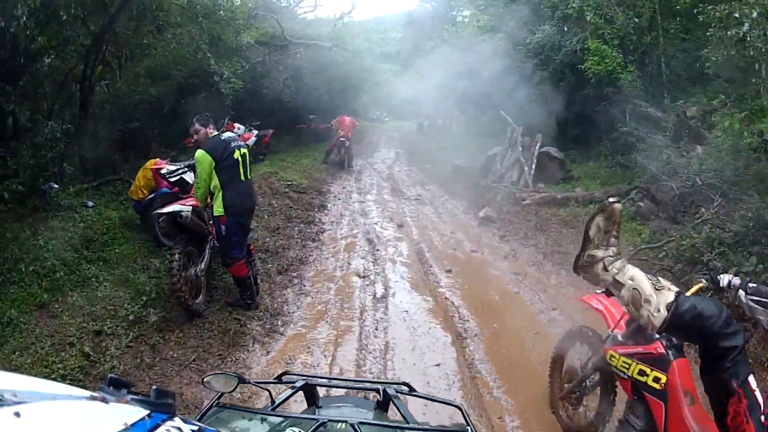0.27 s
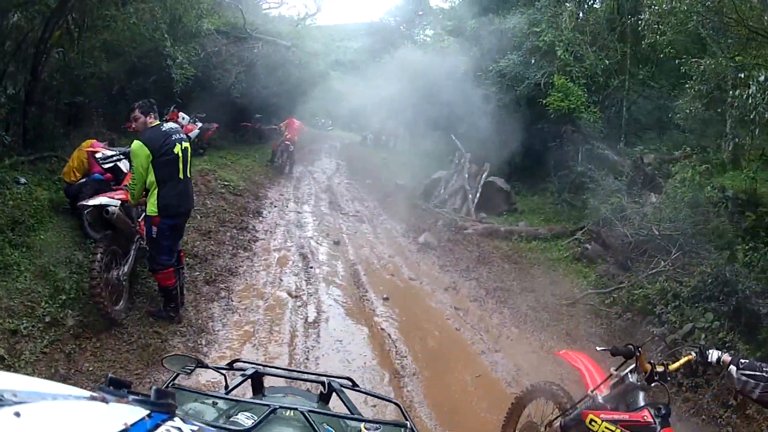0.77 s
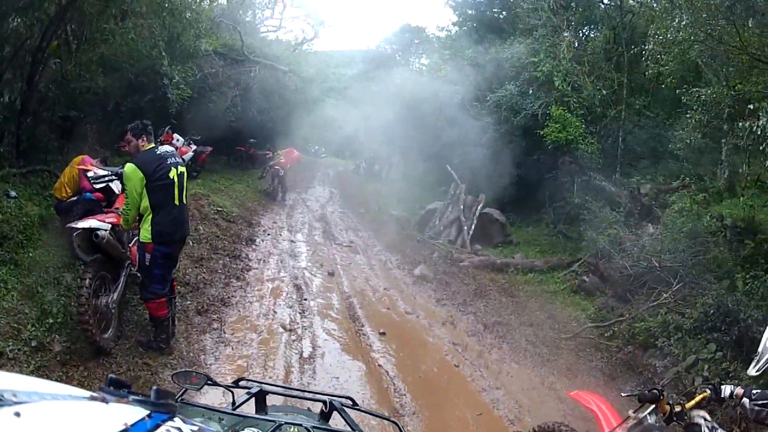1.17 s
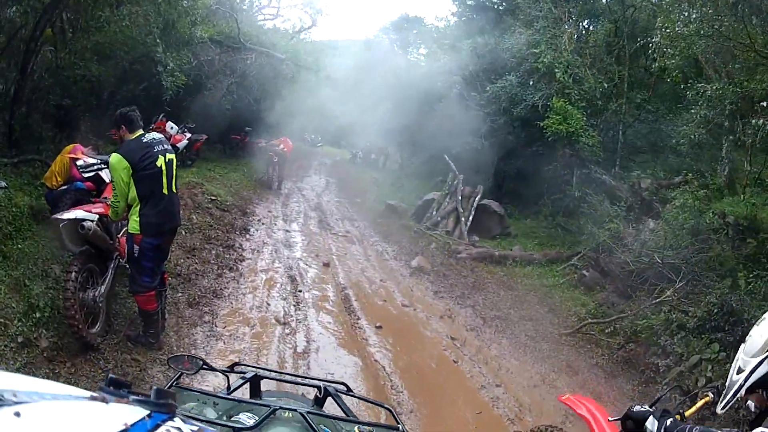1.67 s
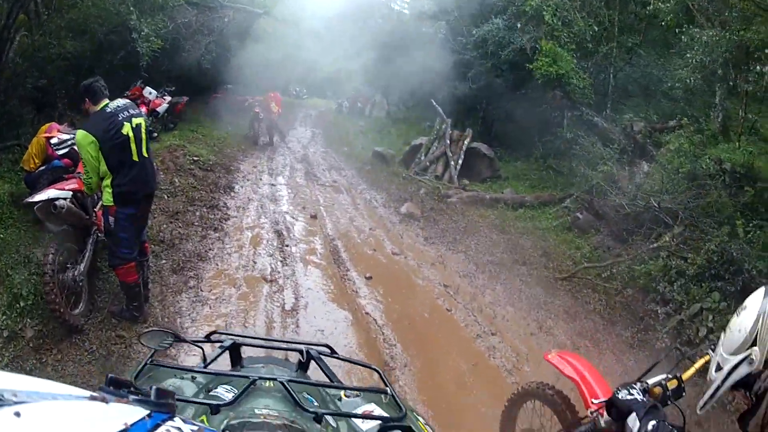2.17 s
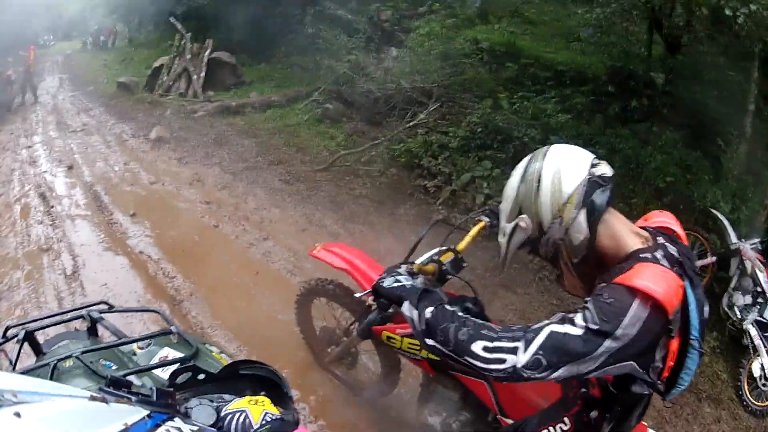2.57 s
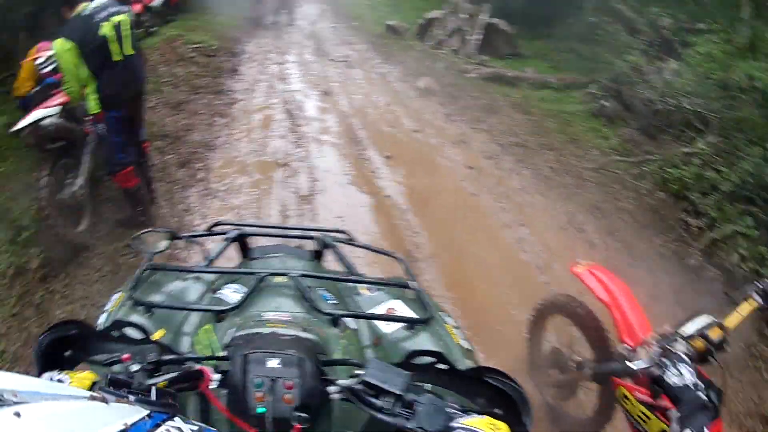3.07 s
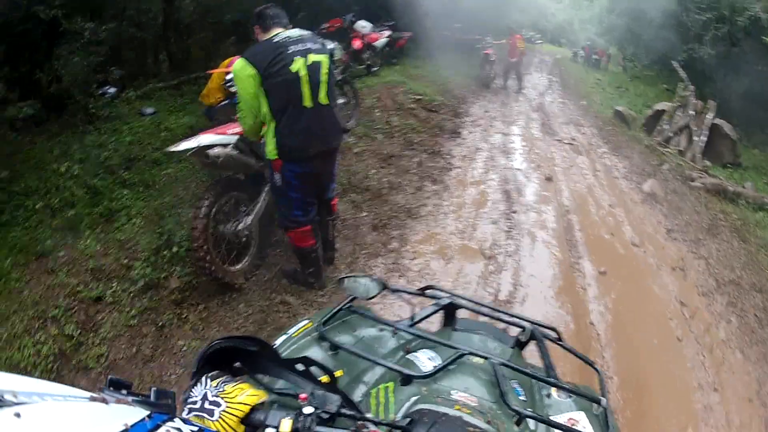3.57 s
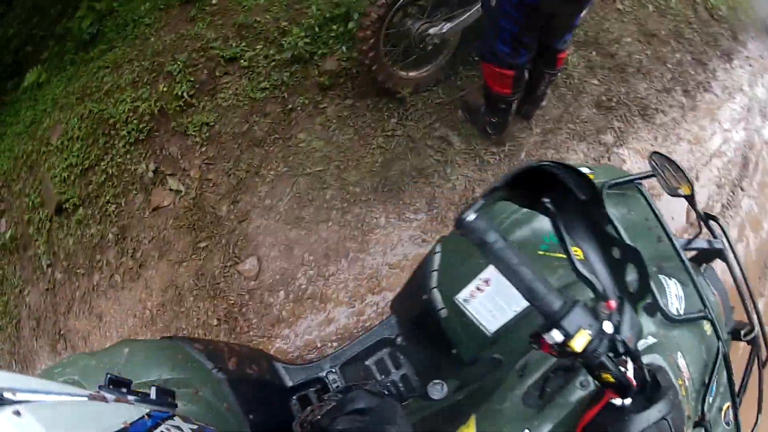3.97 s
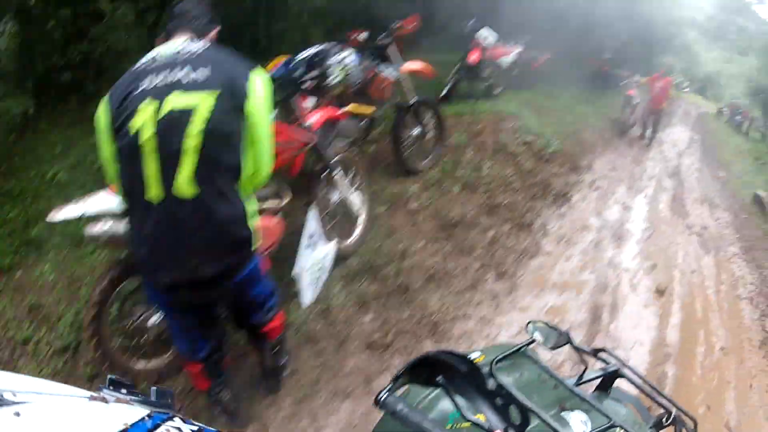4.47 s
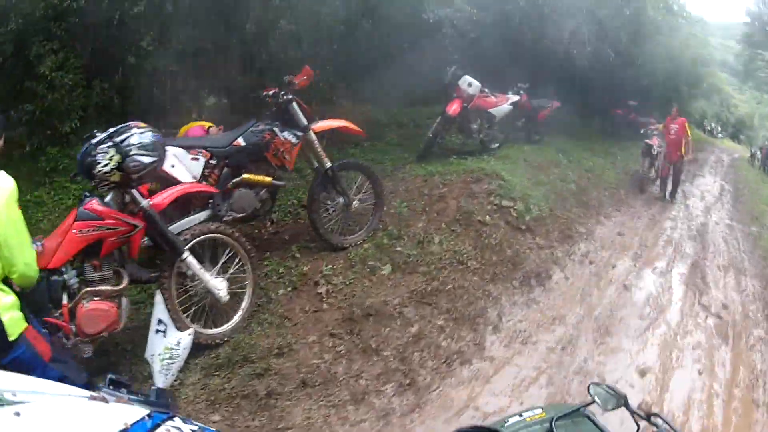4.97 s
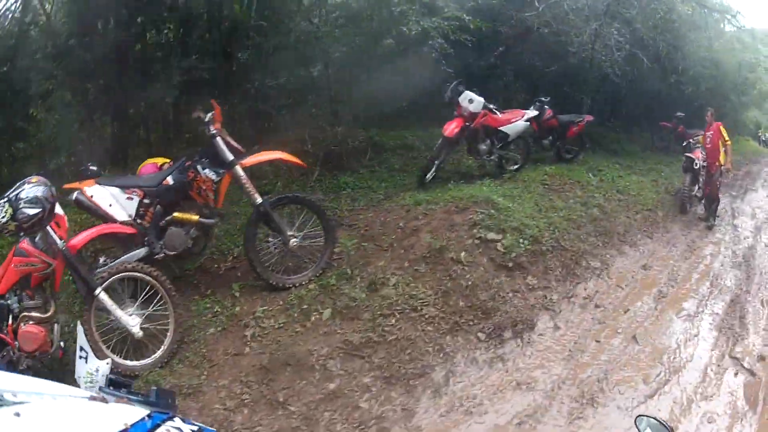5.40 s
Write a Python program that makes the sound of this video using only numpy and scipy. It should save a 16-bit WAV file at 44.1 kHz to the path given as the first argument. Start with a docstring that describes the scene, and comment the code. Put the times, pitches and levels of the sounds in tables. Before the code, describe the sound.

A quad bike engine sinks to a lumpy idle beside a clacking dirt bike, then pulls under throttle while another bike revs far off.

```python
"""On the seat of a single-cylinder quad bike, on a muddy forest track, with a small camera as microphone.
The quad sinks to idle in bursts of resonance from its pipe, while a dirt bike clacks at idle alongside.
Far off in the trees another bike blips its throttle: a few overtones over a blurred roar.
The quad then pulls under throttle, the far bike revs long and falls away, and the quad eases off.
Short clicks and gritty scuffs dot the scene, and the camera mirrors the low sound faintly into the treble."""
import sys
import numpy as np
from scipy.fft import rfft, irfft, next_fast_len
from scipy.io import wavfile
from scipy.ndimage import uniform_filter1d, map_coordinates

SR = 44100
rng = np.random.default_rng(int(sys.argv[2]) if len(sys.argv) > 2 else 0)


def digitize_waveform(pressure):
    """Quantize a signal to 16-bit integers and store it at the path in sys.argv[1].

    Rows of a 2-D input are taken as channels; values are limited to [-1, 1].
    """
    field = np.atleast_2d(pressure).T
    bounded = np.clip(field, -1, 1)
    quanta = np.round(bounded * 32767).astype(np.int16)
    wavfile.write(sys.argv[1], SR, quanta)


N = 248724  # length in samples


def amp(db):
    """Decibels to gain."""
    return 10 ** (np.asarray(db) / 20)


def unit(x):
    """Scale to rms 1."""
    return x / np.sqrt(np.mean(x ** 2) + 1e-20)


def along(points, hz):
    """Interpolate (pitch_hz, value) points on a log frequency axis."""
    point_hz, values = np.transpose(points)
    return np.interp(np.log(hz + 1), np.log(point_hz + 1), values)


def curves(rows):
    """One value per sample for each column after the time."""
    times, *columns = np.transpose(rows)
    return [np.interp(np.arange(N) / SR, times, column) for column in columns]


def wobble(rate):
    """A smooth random curve, rate knots a second."""
    return map_coordinates(rng.standard_normal(2000), [np.arange(N) * rate / SR], mode="wrap")


def filtered(x, response):
    """Multiply the spectrum of x by a response of frequency."""
    m = next_fast_len(N + SR // 2)
    return irfft(rfft(x, m) * response(np.fft.rfftfreq(m, 1 / SR)), m)[:N]


def noise(spectrum):
    """Coloured noise of rms 1."""
    return unit(filtered(rng.standard_normal(N), lambda hz: amp(along(spectrum, hz))))


def add(track, s, sound):
    """Mix a sound into a track at time s."""
    start = int(np.clip(round(s * SR), 0, N))
    track[start:start + len(sound)] += sound[:N - start]


def swell(t, peak, steep):
    """A rise and fall that reaches 1 at the peak time."""
    u = np.maximum(t / peak, 0)
    return (u * np.exp(1 - u)) ** steep


def ringing(modes, t, scatter_db, detune):
    """Damped modes sound together, struck a little differently each time."""
    hz, db, t60 = np.transpose(modes)[:, :, None]
    size, pitch = rng.standard_normal((2, len(modes), 1))
    decay = amp(db + scatter_db * size - 60 * t / t60)
    return np.sum(decay * np.sin(2 * np.pi * hz * (1 + detune * pitch) * t), axis=0)


# the far bike's long pull: start_s, pitch_hz (whine), level_db
FAR_PULL = [(3.78, 588, -44), (3.95, 623.6, -31.5), (4.25, 675, -31), (4.4, 738.4, -28.5),
            (4.56, 756, -34.5), (4.7, 662.3, -32), (4.91, 603.5, -28), (5.25, 515, -62)]
# its throttle blips before that: peak_s, peak_pitch_hz, peak_level_db
FAR_BLIPS = [(2.07, 616, -35.5), (2.449, 658.9, -34.5), (2.881, 644, -32), (3.169, 666, -37)]
BLIP_S = .045  # half length (standard deviation) of a blip


def far_revs():
    """Whine (Hz, dB) of the far bike: each blip lifts pitch and level together."""
    hz, db = curves(FAR_PULL)
    for s, peak_hz, peak_db in FAR_BLIPS:
        lift = np.exp(-((np.arange(N) / SR - s) / BLIP_S) ** 2 / 2)
        hz = hz + lift * (peak_hz - hz)
        db = db + lift * (peak_db - db)
    return hz, db


# overtones that carry from the far bike: multiple (of the firing rate), level_db (relative)
SIDE_ORDERS = [(6, -5.5), (7, 1.5), (8, 7.5), (9, -19)]
# the far exhaust blurred by the trees: pitch_hz, level_db (relative, per Hz)
ROAR = [(250, -19), (450, 0.5), (650, 2), (800, -4.5), (1000, -15.5), (1500, -17), (2300, -16.5),
        (4000, -31)]


def far_bike(roar_db=-4, roar_db_per_hz=0.0471):
    """Only neighbouring overtones carry through the trees, each fading on its own, over a roar that revs swell."""
    hz, db = far_revs()
    firing_rate = hz / 8 * (1 + .016 * wobble(55))  # the whine is the eighth multiple
    phase = 2 * np.pi * np.cumsum(firing_rate) / SR
    tone = sum(np.sin(k * phase) * amp(level + 3 * wobble(22)) for k, level in SIDE_ORDERS)
    roar = amp(roar_db + roar_db_per_hz * (hz - hz.mean())) * noise(ROAR)
    return amp(db) * (unit(tone) + roar)


# the dirt bike's idle alongside, which stumbles once: start_s, cycles (engine cycles so far)
IDLE = [(.096, 0), (.814, 5), (1.065, 7), (1.342, 9), (1.502, 10), (1.689, 11), (1.975, 13), (2.13, 14),
        (2.571, 17), (2.708, 18), (2.853, 19), (3.243, 22), (3.972, 27), (4.437, 30), (5.168, 35),
        (5.6, 38)]
# its level as the camera turns: start_s, level_db (added to each beat)
IDLE_LEVEL = [(0, 1), (2.7, -0.5), (3.3, -3), (4.5, -5), (5.5, -6)]
POWER_CLACK_DB, POWER_THUMP_DB = -28, -12.5  # power stroke, before the level above
OFFBEAT_CLACK_DB, OFFBEAT_THUMP_DB = -39, -23  # the weaker beat, one crank turn later
OFFBEAT_S = .068


def idle_beats(scatter_db=1.2):
    """(s, clack dB, thump dB) of the dirt bike: a strong and a weak beat in every cycle."""
    s, cycles = np.transpose(IDLE)
    beats = []
    for start in np.interp(np.arange(cycles[-1] + 1), cycles, s):
        db = np.interp(start, *np.transpose(IDLE_LEVEL)) + scatter_db * rng.standard_normal(4)
        beats.append((start, POWER_CLACK_DB + db[0], POWER_THUMP_DB + db[1]))
        beats.append((start + OFFBEAT_S, OFFBEAT_CLACK_DB + db[2], OFFBEAT_THUMP_DB + db[3]))
    return beats


# the dirt bike's clack: pitch_hz, level_db (relative, per Hz)
CLACK = [(300, 16.5), (600, 16), (950, 8), (1500, 9.5), (2200, 4), (3100, 2), (4200, -14), (5800, -7.5)]
# its rocker cover: pitch_hz, level_db (relative), t60_s
VALVES = [(1635, -10, 0.11), (1924, -6.5, 0.079), (2125, -15, 0.12), (2235, -5, 0.072)]
# its muffler: pitch_hz, level_db (relative), t60_s
MUFFLER = [(105.3, 1.5, 0.1), (208.3, -3, 0.11), (278.4, 4, 0.037), (343, 0.5, 0.046), (486, -9.5, 0.062)]


def dirt_bike(tail_db=-8, ragged_db=2.5, tail_t60=0.26, valve_db=-38):
    """Each beat is a clack with a ragged rattling tail, a ring of the valve gear and a thump in the muffler."""
    clacks, tails, rings = np.zeros((3, N))
    t = np.arange(SR // 5) / SR
    rise = 1 - np.exp(-t / .0005)
    thump_rise = 1 - np.exp(-t / 0.0016)
    crack = rise * amp(-60 * t / .026)
    for s, clack_db, thump_db in idle_beats():
        add(clacks, s, amp(clack_db) * crack)
        add(tails, s, amp(clack_db + tail_db - 60 * t / tail_t60) * rise)
        # the valve gear rings alike on strong and weak beats
        add(rings, s, amp(valve_db) * rise * ringing(VALVES, t, scatter_db=5.0, detune=0.0285))
        add(rings, s, amp(thump_db) * thump_rise * ringing(MUFFLER, t, scatter_db=2.0, detune=0.042))
    rattle = tails * unit(amp(ragged_db * wobble(220)))
    return (clacks + rattle) * noise(CLACK) + rings


# short clicks, some on the dirt bike's offbeats, others loose ticks and a ping:
# start_s, level_db (before rise and decay), pitch_hz, width (relative to pitch)
CLICKS = [(.154, -35, 1750, 0.4), (.449, -34.5, 1880, 0.31), (1.559, -27, 1940, 0.19),
          (2.311, -29.5, 2200, 0.31), (4.733, -31.5, 2783, 0.39), (4.807, -18, 1946, 0.081)]
# soft scuffs: peak_s, level_db, half_length_s (standard deviation)
SCUFFS = [(0.65, -34, 0.019), (0.835, -37, 0.016), (2.895, -32, 0.015), (3.122, -36, 0.019),
          (3.161, -39, 0.0092)]
# mud scraping underfoot: pitch_hz, level_db (relative, per Hz)
GRIT = [(500, -25), (1000, -2), (2000, -3), (3100, 2), (4200, -5.5), (5800, -14.5)]


def clicks_and_scuffs(t60=0.042):
    """Short clicks are noise in one resonance each; soft scuffs are gritty noise."""
    out, t = np.zeros(N), np.arange(N) / SR
    for s, db, hz, width in CLICKS:
        def resonance(f):
            """A band around the click's pitch."""
            damping = 1j * f * width * hz
            return damping / (hz * hz - f * f + damping)
        ring = unit(filtered(rng.standard_normal(N), resonance))
        add(out, s, ring * amp(db - 60 * t / t60) * (1 - np.exp(-t / 0.00077)))
    rub = sum(amp(db) * np.exp(-((t - s) / length) ** 2 / 2) for s, db, length in SCUFFS)
    grit = amp(3 * wobble(300))
    return out + rub * unit(noise(GRIT) * grit)


# the quad's engine speed: start_s, rate (firings per s)
SPEED = [(0, 17.25), (.39, 14.74), (.47, 10.25), (.56, 14.02), (.81, 10.12), (1.69, 10.64), (2.79, 10.65),
         (2.89, 17.59), (3.2, 21.77), (3.52, 20.06), (3.69, 21.28), (4.68, 20.49), (4.95, 19.39),
         (5.09, 15.92), (5.64, 13.75)]
IDLE_RATE, FULL_RATE = 10.6, 21  # firings per s at idle and at full throttle
IDLE_DB, THROTTLE_BEND = -22, 1.86  # throttle at idle; above 1, the first gain of speed takes the most throttle
PULL_DB, PULL_ACCEL = 6, 55  # extra throttle, and the gain (firings per s per s) that takes most of it


def throttle():
    """Throttle in dB relative to steady full speed: it follows the speed and opens further to accelerate."""
    rate, = curves(SPEED)
    slack = np.maximum((FULL_RATE - rate) / (FULL_RATE - IDLE_RATE), 0)
    gaining = np.maximum(np.gradient(uniform_filter1d(rate, size=2205)) * SR, 0)
    return IDLE_DB * slack ** THROTTLE_BEND + PULL_DB * np.tanh(gaining / PULL_ACCEL)


FIRST_FIRING_S = .019


def firings():
    """(s, throttle dB) of each of the quad's power strokes."""
    rate, = curves(SPEED)
    cycles = np.cumsum(rate) / SR
    cycles -= cycles[round(FIRST_FIRING_S * SR)]
    at = np.searchsorted(cycles, np.arange(np.ceil(cycles[-1])))
    return np.transpose([at / SR, throttle()[at]])


# the shaking chassis: pitch_hz, level_db (relative, per Hz)
RUMBLE = [(15, -45), (30, -20), (42, -40), (62, -5), (100, 0), (150, -8.5), (280, -16.5), (450, -46),
          (900, -58)]


def rumble(level_db=-20.5, load=0.21):
    """The chassis shakes as low noise, more so under load."""
    return amp(level_db + load * throttle()) * noise(RUMBLE)


# the rattling casing: pitch_hz, level_db (relative, per Hz)
CASING = [(90, -62), (180, 1.5), (290, 8.5), (400, 1), (520, -1.5), (650, -1), (780, -9.5), (920, -19),
          (1300, -33)]
# the gas hiss: pitch_hz, level_db (relative, per Hz)
HISS = [(410, -14), (700, -3), (772, -1.5), (828, -16), (937, -18.5), (1280, -10), (1640, -17),
        (2060, -8.5), (2660, -15.5), (2930, -6.5), (3260, -15.5), (3960, -15), (4530, -21.5), (4950, -17),
        (5800, -63), (7540, -62), (12800, -120)]
CASING_DB_PER_RATE, HISS_DB_PER_RATE = 0.21, 0.53  # growth for one more firing per s
CASING_PUFF, HISS_PUFF = .8, .65  # typical surge at a full-throttle firing, over the steady size


def machinery(casing_db=-28, hiss_db=-39.5, grain_db=2, puff_load=0.78):
    """Casing rattle and gas hiss run all the time, grow with the speed and surge with each firing."""
    puffs, t = np.zeros(N), np.arange(SR // 8) / SR
    for s, throttle_db in firings():
        size_db = puff_load * throttle_db + rng.normal(0, 2.1)
        add(puffs, s + 0.015, amp(size_db) * swell(t, peak=0.0067, steep=0.58))
    rate, = curves(SPEED)
    over = rate - FULL_RATE
    casing_level = amp(casing_db + CASING_DB_PER_RATE * over) * (1 + CASING_PUFF * puffs)
    hiss_level = amp(hiss_db + HISS_DB_PER_RATE * over) * (1 + HISS_PUFF * puffs)
    grainy_hiss = unit(noise(HISS) * amp(grain_db * wobble(330)))
    return casing_level * noise(CASING) + hiss_level * grainy_hiss


# the quad's engine block: pitch_hz, level_db (relative, per Hz)
KNOCK = [(250, -30), (400, 11), (650, 14), (950, 0), (1500, -10), (1800, -1.5), (2250, 4), (2650, -2),
         (3000, -10), (4200, -8.5), (5800, -15)]


def chatter(level_db=-28, load=1.0, scatter_db=3, t60=0.031, count=3):
    """Each power stroke knocks the piston and chain about: a few uneven taps, harder under load."""
    taps, t = np.zeros(N), np.arange(SR // 16) / SR
    for s, throttle_db in firings():
        for k in range(count):
            lag = .014 + .008 * k + rng.normal(0, .002)
            tap_db = level_db + load * throttle_db - 3.9 * k + scatter_db * rng.standard_normal()
            add(taps, s + lag, amp(tap_db - 60 * t / t60))
    return taps * noise(KNOCK)


# exhaust and airbox, right at the seat:
# pitch_hz, level_db (at 0 dB throttle), delay_s, swell_s, load (dB per dB of throttle)
PIPE = [(92, -17.5, 0, .008, -.3), (110, -6.5, .0065, .0142, .65), (244, -7.2, .007, .0112, .76),
        (44, -27.5, 0, .025, -.06), (290, -18, .0084, .0046, .12), (160, -24, .012, .013, .3)]


def exhaust(scatter_db=0.54, detune=0.0021):
    """Each firing swells and dies in the pipe; an open throttle wakes the upper resonances."""
    out, t = np.zeros(N), np.arange(SR // 8) / SR
    for s, throttle_db in firings():
        for k, (hz, db, delay, peak, load) in enumerate(PIPE):
            size, pitch = rng.standard_normal(2)
            ring = np.sin(2 * np.pi * hz * (1 + detune * pitch) * t) * swell(t, peak, 3.2)
            polarity = (-1) ** k
            add(out, s + delay, polarity * amp(db + load * throttle_db + scatter_db * size) * ring)
    return out


def scene():
    """All the engines at one microphone, from the far trees to the seat."""
    around = far_bike() + dirt_bike() + clicks_and_scuffs()
    quad = rumble() + machinery() + chatter() + exhaust()
    return (around + quad)[None]


# the camera's mirror image: pitch_hz (of the low sound), level_db (of its image)
MIRROR = [(40, -49), (110, -41), (250, -32.5), (630, -24.5), (1000, -20.5), (2000, -13.5), (3000, -9.5),
          (4000, -6), (5000, -2)]
IMAGE_HZ, TOP_HZ = 12000, 15300  # carrier of the image, and the highest frequency kept


def record(dry):
    """The camera keeps a narrow band, mirrors it about a high carrier and clips at full scale."""
    band = filtered(dry[0], lambda hz: np.clip((IMAGE_HZ / 2 - hz) / 600, 0, 1))
    carrier = 2 * np.cos(2 * np.pi * IMAGE_HZ * np.arange(N) / SR)
    image = filtered(band, lambda hz: amp(along(MIRROR, hz))) * carrier
    return filtered(np.clip(band + image, -1, 1), lambda hz: hz < TOP_HZ)[None]


dry = scene()
out = record(dry)
digitize_waveform(out)
```